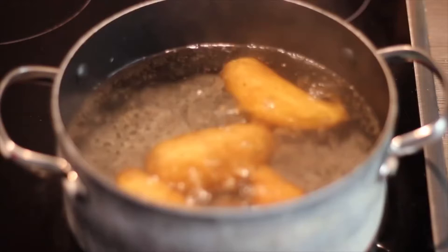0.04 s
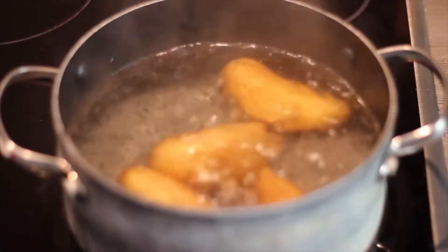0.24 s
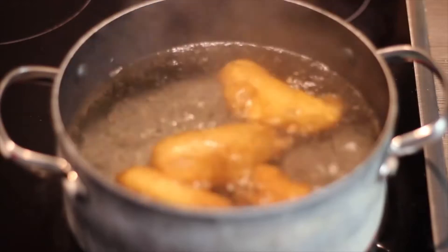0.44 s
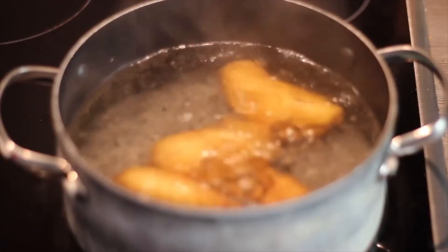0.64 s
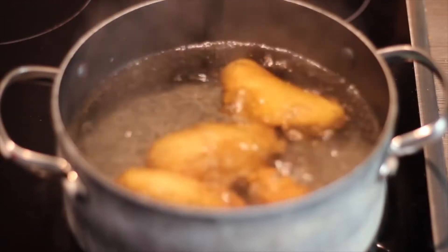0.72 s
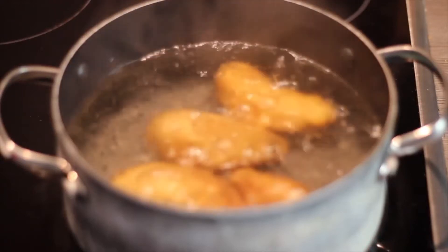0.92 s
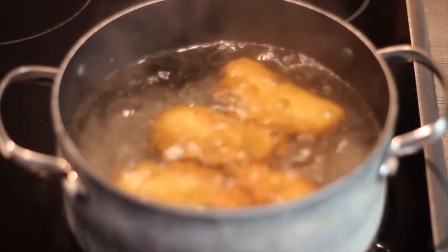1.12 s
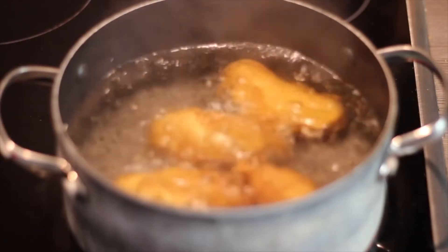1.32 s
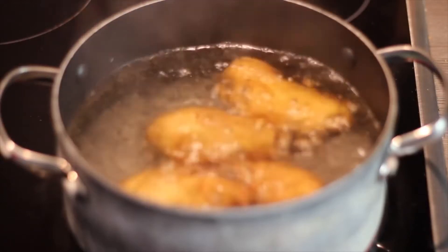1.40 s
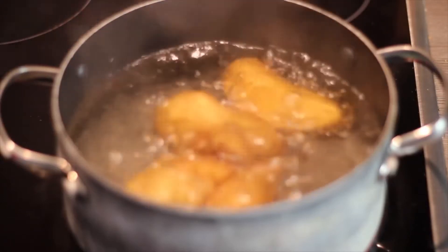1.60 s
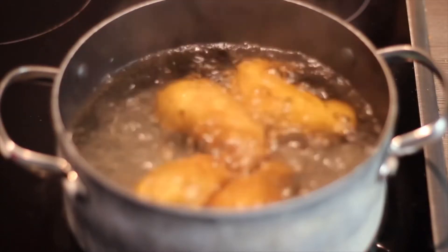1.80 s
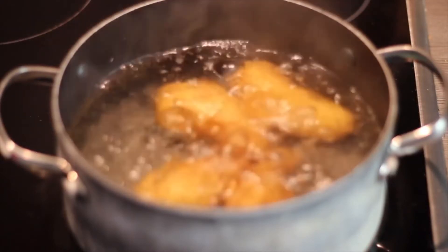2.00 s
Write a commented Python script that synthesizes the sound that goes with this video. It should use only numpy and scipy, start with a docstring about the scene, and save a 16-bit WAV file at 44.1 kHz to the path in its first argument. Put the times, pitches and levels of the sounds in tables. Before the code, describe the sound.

Boiling water bubbles busily in a steel pot of potatoes, close to a stereo microphone in a kitchen. After an instant of near silence, bubbles plop, slide up in pitch and burst, with fine crackle and a brief ring from the pan.

```python
"""Water boils hard around potatoes in a steel saucepan, close to a small stereo microphone.
After near silence, the boil comes up at 0.2 s: a soft wash, churning and fine crackle.
From then to the end at 2 s, steam bubbles break loose with a low plop, glide up in pitch as they
near the surface and burst with a pop, spattering droplets. The boil is strongest near 0.6 s, 1.25 s
and at the end. Throughout, the air in the pan and the kitchen ring briefly."""
import sys
import numpy as np
from scipy import signal
from scipy.fft import rfft, irfft, next_fast_len
from scipy.io import wavfile
from scipy.ndimage import uniform_filter1d, minimum_filter1d, map_coordinates

SR = 44100
rng = np.random.default_rng(int(sys.argv[2]) if len(sys.argv) > 2 else 0)


def wav_out(sig):
    """Save sig, one row per channel (or a flat mono array), as 16-bit PCM at SR to the path in sys.argv[1]."""
    wavfile.write(sys.argv[1], SR, np.round(np.clip(np.atleast_2d(sig).T, -1, 1) * 32767).astype(np.int16))


N = 90537


def amp(db):
    """Decibels to gain."""
    return 10 ** (np.asarray(db) / 20)


def unit(x):
    """Scale to rms 1."""
    return x / np.sqrt(np.mean(x ** 2) + 1e-20)


def along(points, hz):
    """Interpolate (Hz, value) points on a log frequency axis."""
    f, v = np.transpose(points)
    return np.interp(np.log(hz + 1), np.log(np.abs(f) + 1), v)


def clock(length_s):
    """Sample times in seconds."""
    return np.arange(int(length_s * SR)) / SR


def wobble(t, knots_per_s):
    """Smooth random curve."""
    return map_coordinates(rng.standard_normal(1024), [t * knots_per_s], mode="wrap")


def filtered(x, response):
    """Apply a complex frequency response."""
    size = next_fast_len(x.shape[-1] + 4096)
    return irfft(rfft(x, size) * response(np.fft.rfftfreq(size, 1 / SR)), size)[..., :x.shape[-1]]


def coloured(x, colour, size=4096):
    """Minimum-phase filter through (Hz, dB) points."""
    cepstrum = irfft(np.log(amp(along(colour, np.fft.rfftfreq(size, 1 / SR)))))
    cepstrum[1:size // 2] *= 2
    cepstrum[size // 2 + 1:] = 0
    return signal.fftconvolve(x, irfft(np.exp(rfft(cepstrum))))[:len(x)]


def add(out, start_s, x, lag_spread_s=7e-6):
    """Mix in x from a random spot in the pan: it reaches the two microphone ports slightly apart."""
    i = int(np.clip(round(start_s * SR), 0, N - 1))
    lag_s = lag_spread_s * rng.standard_normal()
    stereo = filtered(x, lambda hz: np.exp(1j * np.pi * hz * lag_s * np.array([[1], [-1]])))
    out[:, i:i + len(x)] += stereo[:, :N - i]


def ping(t, hz, t60_s, glide, onset_cycles=0.263):
    """A bubble rings and dies; its pitch rises by the fraction glide per t60."""
    onset = (1 - np.exp(-t * hz / onset_cycles)) ** 2
    return np.sin(2 * np.pi * hz * t * (1 + glide * t / t60_s / 2)) * amp(-60 * t / t60_s) * onset


def swarm(length_s, per_s, low_hz, high_hz, t60_cycles, spread_db, glide, size=1024):
    """Many small bubbles at random times, pitches and strengths; rms 1."""
    n, count = int(length_s * SR), max(int(per_s * length_s), 2)
    draws = np.random.default_rng(rng.integers(2 ** 31)).random((count, 3))
    when, pitch, strength = draws.T[:, :, None]
    hz = low_hz * (high_hz / low_hz) ** pitch
    grains = amp(spread_db * strength ** 3) * ping(np.arange(size) / SR, hz, t60_cycles / hz, glide)
    indices = (when * n).astype(int) + np.arange(size)
    return unit(np.bincount(indices.ravel(), grains.ravel(), n)[:n])


def kitchen(x):
    """Faint, short room tail, different at each port."""
    # Each row: frequency in Hz, t60 in seconds.
    decay = [(200, 0.101), (1500, 0.09), (6000, 0.068), (15000, 0.088)]
    # Each row: frequency in Hz, gain in dB.
    colour = [(60, -51.5), (200, -46.5), (700, -31.5), (1500, -18), (4000, -13), (12000, -5.5)]
    bin_hz, t, noise = signal.stft(rng.standard_normal((2, SR // 3)), SR, nperseg=256)
    tail = signal.istft(noise * amp(-60 * t / along(decay, bin_hz)[:, None]), SR, nperseg=256)[1]
    wet = signal.fftconvolve(x, tail / np.linalg.norm(tail[0]), axes=1)[:, :N]
    return filtered(wet, lambda hz: amp(along(colour, hz)))


def walls(x, t60_s=0.0207, attack_s=0.0012):
    """Treble bounces briefly between the steel walls, differently for each port."""
    # Each row: frequency in Hz, gain in dB.
    colour = [(60, -53.5), (250, -40), (1000, -23.5), (2500, -11), (6000, -6), (13000, -3.5)]
    t = clock(.04)
    echoes = rng.standard_normal((2, len(t))) * amp(-60 * t / t60_s) * np.minimum(t / attack_s, 1)
    echoes /= np.linalg.norm(echoes, axis=1, keepdims=True)
    wet = signal.fftconvolve(x, echoes, axes=1)[:, :N]
    return filtered(wet, lambda hz: amp(along(colour, hz)))


def pan_air(x):
    """Adds the ring of the air between the steel walls."""
    # Each row: frequency in Hz, gain at resonance in dB, t60 in seconds.
    modes = [(588.2, -10, 0.03), (886, -13, 0.21), (1146, -20, 0.099), (1434.7, -8.5, 0.045),
             (1714, -16.5, 0.043), (1921, -13, 0.03), (2288, -10.5, 0.045), (3181, -16.5, .04)]
    t = clock(.15)
    ring = sum(amp(db - 60 * t / t60_s) * np.sin(2 * np.pi * hz * t) * 2 * np.log(1000) / (t60_s * SR)
               for hz, db, t60_s in modes)
    return x + signal.fftconvolve(x, ring[None], axes=1)[:, :N]


def simmer(spots=4, churn_db=-44, crackle_db=-56, wash_db=-48.5):
    """Lesser bubbles churn and crackle in clumps over a soft wash, all following the boil."""
    # Strength of the boil. Each row: time in seconds, gain in dB.
    boil = [(0, -70), (.17, -63), (.2, -20.5), (.255, -19.5), (.28, -11.5), (.32, -3), (.54, -6), (.63, 3),
            (.7, -6), (.84, -3), (.96, 0), (1.02, -2.5), (1.12, 0.5), (1.25, 4), (1.4, 2.5), (1.6, -4),
            (1.75, -2), (1.88, 0.5), (1.97, -3), (2.05, 5.5)]
    # Layer spectra. Each row: frequency in Hz, relative level in dB.
    churn_colour = [(25, -16), (80, -16.5), (150, -1), (240, -5.5), (600, -0.5), (1300, -4), (2000, -5.5),
                    (4000, -31)]
    crackle_colour = [(1000, -12), (2700, 0), (4500, -9), (6500, -1.5), (10000, -3.5), (15000, -12.5)]
    wash_colour = [(25, -2), (70, 11.5), (150, 6), (260, 7.5), (500, 8.5), (1300, 2), (2200, -11.5),
                   (4500, -16), (6500, -18), (10000, -19.5), (15000, -25.5)]
    t, out = np.arange(N) / SR, np.zeros((2, N))
    boil_db = np.interp(t, *np.transpose(boil))
    length_s = N / SR + .1
    for _ in range(spots):
        churn = swarm(length_s, per_s=25, low_hz=199.6, high_hz=1898,
                      t60_cycles=16.9, spread_db=12, glide=0.18, size=4096)[-N:]
        crackle = swarm(length_s, per_s=130, low_hz=2033, high_hz=14130,
                        t60_cycles=17.8, spread_db=22, glide=.08)[-N:]
        clumps = amp(2.5 * wobble(t, knots_per_s=60))
        wash = unit(coloured(rng.standard_normal(N), wash_colour))
        wash *= amp(3.38 * wobble(t, knots_per_s=51))
        mix = (amp(churn_db) * unit(coloured(churn, churn_colour))
               + amp(crackle_db) * unit(coloured(crackle * clumps, crackle_colour))
               + amp(wash_db) * wash)
        add(out, 0, mix * amp(boil_db) / np.sqrt(spots))
    return out


def heave(bubbles, gain_db=-23, smooth_s=0.014):
    """Water sloshes around each big bubble, as strongly as the bubble rings."""
    # Each row: frequency in Hz, relative level in dB.
    colour = [(20, -14.5), (55, 2), (110, 0.5), (200, 3), (450, 1), (1300, -3), (2200, -24), (6000, -41.5)]
    bubble_rms = np.sqrt(np.abs(uniform_filter1d(bubbles[0] ** 2, int(smooth_s * SR))))
    return amp(gain_db) * bubble_rms * unit(coloured(rng.standard_normal(N), colour))


def snaps(gain_db=.5, t60_s=0.01):
    """A tearing bubble film gives a short, bright tick."""
    # Each row: start in seconds, relative peak in dB.
    tears = [(0.3486, -43), (0.406, -38), (0.4536, -36.5), (0.5889, -42.5), (0.6317, -40.5), (0.6692, -31),
             (0.7241, -34.5), (0.7561, -38.5), (0.8451, -29), (0.8736, -36.5), (0.9607, -37), (1.044, -40),
             (1.059, -38), (1.1238, -31.5), (1.1322, -28), (1.1721, -32), (1.2825, -25), (1.3768, -33.5),
             (1.407, -33), (1.4629, -33), (1.536, -32), (1.6164, -33.5), (1.6222, -26), (1.6882, -22),
             (1.7847, -45), (1.8187, -35.5), (1.8815, -32.5), (2.024, -37.5), (2.0403, -31.5)]
    # Each row: frequency in Hz, relative level in dB.
    colour = [(500, -31.5), (2000, -4.5), (4500, -2.5), (6500, 1), (10000, -2.5), (15000, -11.5)]
    out, t = np.zeros((2, N)), clock(.03)
    for start_s, db in tears:
        tick = coloured(rng.standard_normal(len(t)) * amp(-60 * t / t60_s), colour)
        add(out, start_s, amp(db + gain_db) * tick / np.abs(tick).max())
    return out


def spatter(gain_db=0.5, spray_gain_db=-3.5, tail_s=0.0033):
    """A big bubble bursts and throws a short shower of droplets and finer spray."""
    # Each row: start in seconds, length in seconds, relative level in dB, spray offset in dB.
    showers = [(0.318, .016, -39, -16.5), (.344, .014, -46.5, -5.5), (0.619, 0.0303, -35, -16),
               (0.658, 0.0256, -42.5, -8.5), (0.941, 0.02404, -34, -9.5), (0.958, 0.013, -31.5, -16.5),
               (1.119, 0.0157, -55, 8), (1.161, .016, -47, 1), (1.212, 0.0196, -31, -20.5),
               (1.235, .022, -24.5, -19.5), (1.265, 0.027, -39, -11), (1.398, 0.0258, -46.5, -5.5),
               (1.454, .02, -36, -6), (1.615, .011, -49, 0), (1.72, 0.0147, -35, -17.5),
               (1.731, 0.01614, -29.5, -19.5), (1.821, 0.017, -40.5, -7.5), (2.022, 0.0261, -36.5, -7.5)]
    # Each row: frequency in Hz, relative level in dB.
    drop_colour = [(200, -17.5), (900, 3.5), (1900, 3), (3000, -6), (5000, -28), (9000, -32),
                   (15000, -43.5)]
    out = np.zeros((2, N))
    for start_s, length_s, db, spray_db in showers:
        drops = swarm(length_s + .03, per_s=2600, low_hz=887, high_hz=6110,
                      t60_cycles=10.4, spread_db=16.5, glide=.1)
        spray = swarm(length_s + .03, per_s=1300, low_hz=3444, high_hz=14100,
                      t60_cycles=10.9, spread_db=20, glide=.1)
        shower = unit(coloured(drops, drop_colour)) + amp(spray_gain_db + spray_db) * spray
        t = np.arange(len(drops)) / SR
        envelope = np.minimum(2 * t / length_s, 1) * np.exp(-np.maximum(t - length_s, 0) / tail_s)
        add(out, start_s, amp(gain_db + db) * shower * envelope)
    return out


def pops(gain_db=-0.3861, glide=0.0552):
    """Small bubbles ring as they open at the surface."""
    # Each row: start in seconds, initial pitch in Hz, relative level in dB, t60 in seconds.
    bubbles = [(0.2654, 7500, -43.5, 0.0107), (0.292, 588, -24.5, 0.0456), (0.323, 1430, -21.5, 0.0608),
               (0.3462, 1923, -29, 0.0193), (0.3492, 3514, -37, 0.0328), (0.3696, 4294, -39.5, 0.0142),
               (0.3901, 1086, -23.5, 0.0326), (0.4078, 6260, -40, 0.0127), (0.5172, 2460, -39.5, 0.045),
               (0.5908, 974, -18, 0.0217), (0.6333, 3130, -20.5, 0.012), (0.6339, 3990, -16, 0.0079),
               (0.6665, 2302, -21, 0.0292), (0.7362, 8470, -32, 0.0088), (0.7937, 1001, -22, 0.061),
               (0.7953, 7980, -22, 0.0038), (0.8176, 3120, -33.5, 0.0213), (0.8286, 2643, -29.5, 0.016),
               (0.829, 4460, -36, 0.0097), (0.9615, 1387, -11.5, 0.011), (0.9618, 1700, -12.5, 0.025),
               (0.9622, 2986, -29, 0.0223), (1.1341, 4370, -39.5, 0.0187), (1.1663, 2533, -30, 0.037),
               (1.2672, 2083, -21, 0.0315), (1.2675, 6778, -31, 0.0363), (1.283, 2697, -30.5, 0.026),
               (1.2834, 6203, -27.5, 0.02), (1.2969, 1364, -9.5, 0.0201), (1.3136, 4240, -27.5, 0.0263),
               (1.3773, 1453, -23.5, 0.0172), (1.4063, 2857, -30.5, 0.026), (1.4066, 1496, -25.5, 0.023),
               (1.421, 2240, -30, 0.0356), (1.4583, 3194, -29, 0.0162), (1.5364, 5700, -28, 0.0107),
               (1.5537, 2381, -28.5, 0.0255), (1.5541, 1384, -22.5, 0.013), (1.571, 1975, -37, 0.051),
               (1.6469, 8082, -29, 0.0101), (1.6771, 5920, -28, 0.0119), (1.689, 7287, -32, 0.0192),
               (1.6894, 6112, -22.5, 0.0174), (1.7759, 3410, -34.5, 0.0184), (1.8394, 488, -12.5, 0.0364),
               (1.9668, 2962, -34.5, 0.0248), (2.0197, 780, -8.5, 0.0069), (2.0391, 1538, -17.5, 0.0427),
               (2.0421, 6180, -31, 0.011)]
    out = np.zeros((2, N))
    for start_s, hz, db, t60_s in bubbles:
        add(out, start_s, amp(db + gain_db) * ping(clock(t60_s), hz, t60_s, glide))
    return out


def plops(gain_db=1, glide=0.033):
    """Big steam bubbles ring low as they pinch off deep in the water."""
    # Each row: start in seconds, initial pitch in Hz, relative level in dB, t60 in seconds.
    bubbles = [(0.277, 240, -34, 0.07), (0.292, 261.3, -27.5, 0.115), (0.3916, 327.6, -26.5, 0.1186),
               (0.454, 238, -33, 0.042), (0.4845, 250.6, -26, 0.079), (0.5508, 245.1, -29.5, 0.133),
               (0.6512, 312, -11, 0.0173), (0.7414, 243.9, -20, 0.0653), (0.792, 241.4, -21, 0.101),
               (0.8876, 232, -18, 0.113), (0.9464, 241.8, -11, 0.072), (1.029, 262.2, -21.5, 0.11),
               (1.0867, 210.5, -13, 0.1406), (1.2055, 254.6, -17.5, 0.11), (1.3358, 231.2, -15.5, 0.054),
               (1.3589, 234.4, -23.5, 0.163), (1.4371, 246, -17, 0.073), (1.5661, 227.5, -20, 0.0984),
               (1.6399, 231.8, -27, 0.119), (1.669, 228.5, -25, 0.106), (1.7113, 356.5, -2, 0.0169),
               (1.8058, 224.3, -23, 0.0885), (1.8416, 232.3, -11, 0.0823), (1.871, 264.3, -18.5, 0.054),
               (2.0164, 265.6, -19.5, 0.122)]
    out = np.zeros((2, N))
    for start_s, hz, db, t60_s in bubbles:
        add(out, start_s, amp(db + gain_db) * ping(clock(t60_s), hz, t60_s, glide))
    return out


def risers(gain_db=0.16, attack_s=0.00123, release_s=0.00499, waver=0.02185, flutter_db=1.0):
    """A bubble's pitch climbs as it nears the surface; its wobbling shape shakes pitch and level."""
    # Each row: start in seconds, length in seconds, start and end pitch in Hz, glide bend (+ late,
    # - early), relative crest level in dB, crest position 0-1, swell before and fade after it in dB.
    bubbles = [(0.191, 0.0328, 834.6, 1263, 0.04, -48.5, 0.4, 8, 8.5),
               (0.224, 0.0207, 2593, 3785, 1, -53.5, 0.32, 10, 11.5),
               (0.236, 0.0314, 1488, 2510, 2, -62.5, 0.62, 5, 1),
               (0.27, 0.0649, 326.8, 1272, 1.13, -31, 0.42, 24.5, -3),
               (0.317, 0.02643, 317.3, 501.4, 0.5, -15.5, 0.13, 2.5, 8.5),
               (0.338, 0.024, 439.6, 884.5, 0.57, -11.5, 0.4, 11, 7.5),
               (0.345, 0.04615, 615.1, 927, -2.5, -16.5, 0.11, 4.5, 34.5),
               (0.398, 0.0931, 467.8, 1483, 3, -25.5, 1, 8.5, -5),
               (0.467, 0.06495, 462, 1493, 3.5, -31, 0.84, 4.5, -4.5),
               (0.5, 0.028, 1850, 2700, 1, -45, 0.76, 11.5, 3.5),
               (0.553, 0.0557, 322.9, 1034, 1.53, -24.5, 0.41, 17.5, 6.5),
               (0.589, 0.0397, 274.5, 936.3, 2.23, -16, 1, 9.5, 20.5),
               (0.614, 0.025, 1009, 1963, 1.95, -27, 0.46, 27.5, -1.5),
               (0.615, 0.0565, 712.5, 1326, 2.5, -21.5, 0.67, -7, 6.5),
               (0.662, 0.0983, 267.4, 1024, 1.437, -21, 0.78, 7, 11.5),
               (0.734, 0.062, 1026, 1379, 1.2, -38.5, 0.48, 2.5, 22),
               (0.859, 0.05298, 296.4, 1367, 0.6, -11, 0.73, 19, 18),
               (0.946, 0.0453, 579, 1608, 1.49, -22, 0.52, 0.5, 3.5),
               (0.957, 0.1107, 299.3, 1152, 2.5, -27, 0.1, -5.5, 7.5),
               (1.082, 0.0374, 1154, 1738, 2, -28.5, 0.08, 0.5, 16),
               (1.152, 0.0831, 344.9, 962.3, -0.06, -22, 0.25, 20.5, 14.5),
               (1.224, 0.093, 282, 761, -3.5, -1.5, 0.26, 10, 29.5),
               (1.226, 0.0375, 866.6, 943, -1.57, -8.5, 0.28, 7, 21),
               (1.294, 0.036, 1051, 1644, -0.08, -27.5, 0.87, 1, 6.5),
               (1.317, 0.0587, 751.3, 1168, -0.21, -27.5, 0.4, 3.5, 14.5),
               (1.414, 0.098, 381.3, 1558, 2.5, -17.5, 0.46, 38.5, 5.5),
               (1.454, 0.08843, 217.5, 1025, 0.45, -5, 0.51, 14, 14),
               (1.6, 0.0776, 221.2, 570.5, -1.48, -36.5, 1, 10, 2.5),
               (1.666, 0.0215, 952, 1436, 1, -41, 0.57, 10.5, 6.5),
               (1.711, 0.019, 474, 1736, -1.04, -20, 0.77, 4, 23),
               (1.723, 0.0931, 324.3, 996, 0.9853, -16, 0.33, 0.5, 14.5),
               (1.724, 0.03484, 606.7, 1249, -3.5, -11, 0.56, 9.5, 26),
               (1.87, 0.0431, 566, 1576, 0.25, -24.5, 0.81, 0, 15.5),
               (1.872, 0.1025, 237.3, 369.5, -1.68, -19, 0.06, -3.5, 16),
               (1.878, 0.0587, 523.8, 1496, -0.5245, -20, 0.59, 4.5, 15),
               (1.92, 0.0606, 431.6, 1256, 1.22, -13.5, 0.22, 26.5, 24),
               (1.978, 0.072, 402.4, 1181, 0.13, -23.5, 0.71, 10.5, 21)]
    out = np.zeros((2, N))
    for start_s, length_s, start_hz, end_hz, bend, db, crest, swell_db, fade_db in bubbles:
        t = clock(length_s)
        progress = t / length_s
        hz = start_hz + (end_hz - start_hz) * np.expm1(bend * progress) / np.expm1(bend)
        hz *= 1 + waver * wobble(t, knots_per_s=149.9)
        drop_db = np.interp(progress, [0, np.clip(crest, .05, .95), 1], [swell_db, 0, fade_db])
        level_db = gain_db + db - drop_db + flutter_db * wobble(t, knots_per_s=132.4)
        edges = np.minimum(t / attack_s, 1) * np.minimum((length_s - t) / release_s, 1)
        add(out, start_s, amp(level_db) * edges * np.sin(2 * np.pi * np.cumsum(hz) / SR))
    return out


def scene():
    """All the bubbles, in the pan, in the kitchen."""
    big = risers() + plops()
    small = pops() + snaps() + spatter() + simmer()
    near = pan_air(big + heave(big) + small)
    return near + walls(near) + kitchen(near)


def record(dry, ceiling=.8, hold_s=.006, top_hz=15900):
    """Stereo microphone: the left port leads in the treble; then a peak limiter and a band limit."""
    # Each row: frequency in Hz, phase lead of the left port in radians.
    lead = [(0, 0), (2000, -0.0659), (5200, 0.2438), (8000, 0.95), (12000, 1.55), (15600, 3.5)]
    sides = np.array([[1], [-1]])
    ports = filtered(dry, lambda hz: np.exp(.5j * np.interp(hz, *np.transpose(lead)) * sides))
    hold = int(hold_s * SR)
    needed_gain = ceiling / np.maximum(np.abs(ports).max(axis=0), ceiling)
    gain = uniform_filter1d(minimum_filter1d(needed_gain, 2 * hold), hold)
    return filtered(ports * gain, lambda hz: hz < top_hz)


dry = scene()
out = record(dry)
wav_out(out)
```